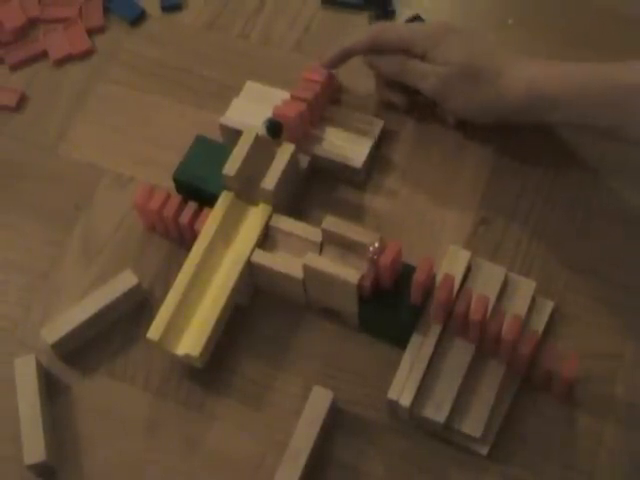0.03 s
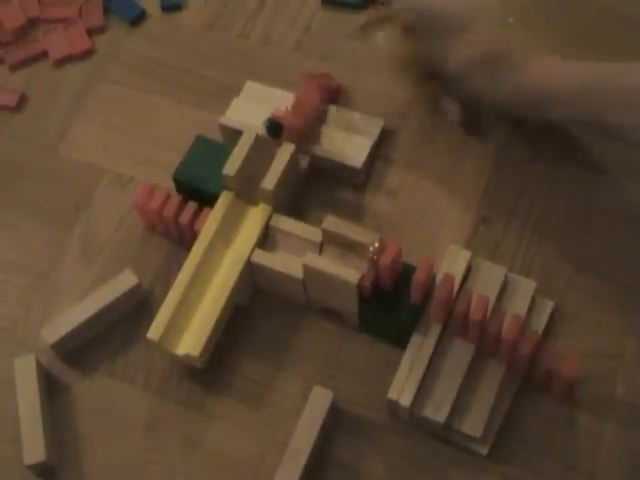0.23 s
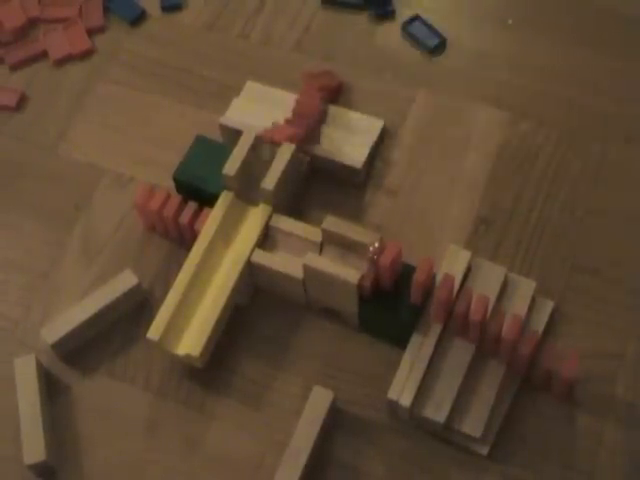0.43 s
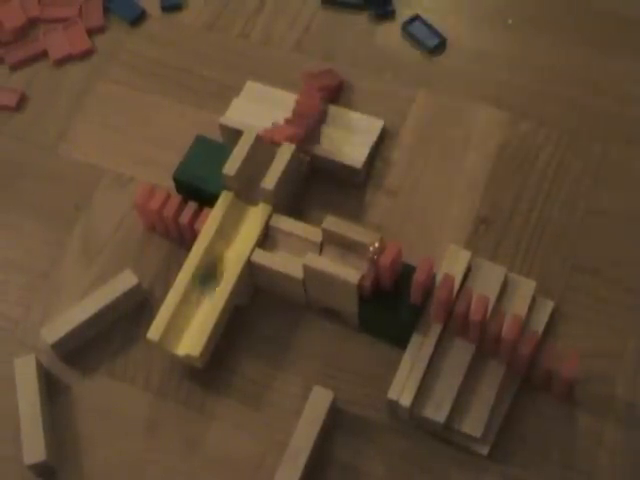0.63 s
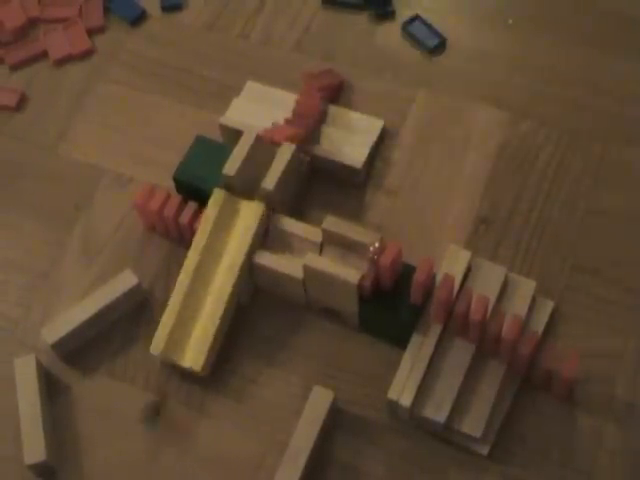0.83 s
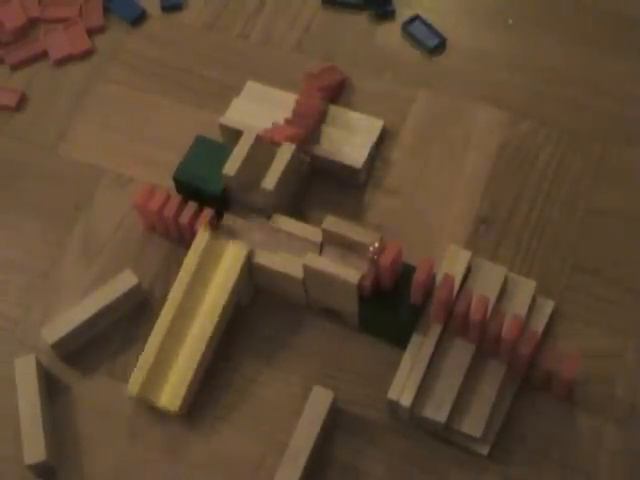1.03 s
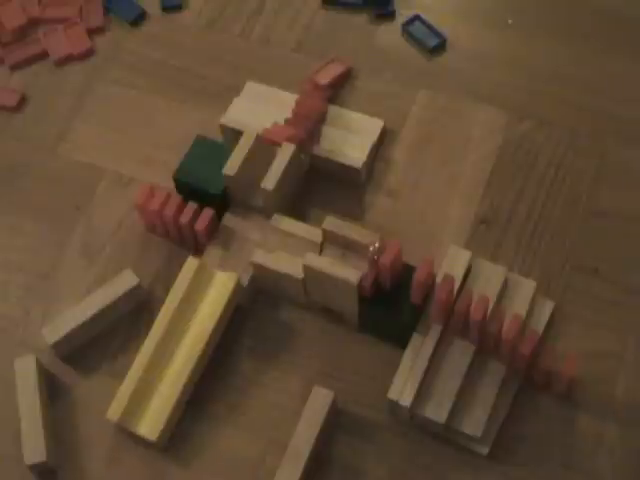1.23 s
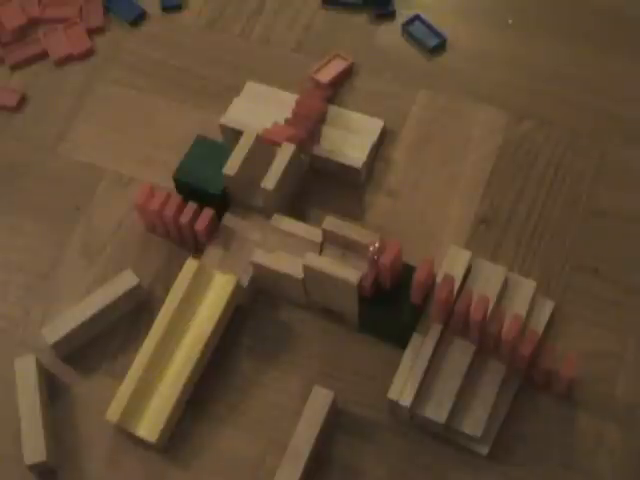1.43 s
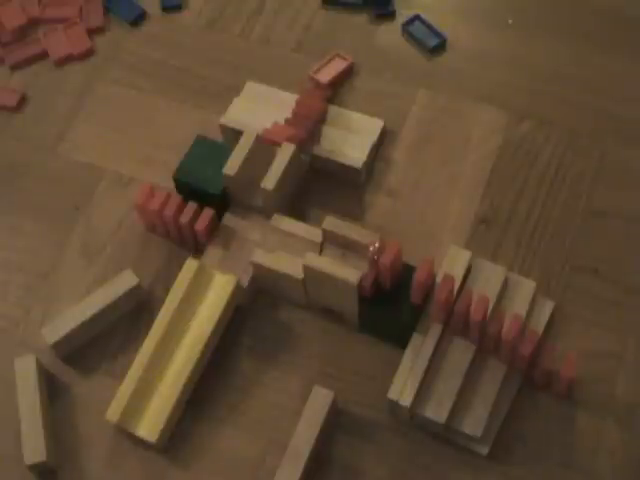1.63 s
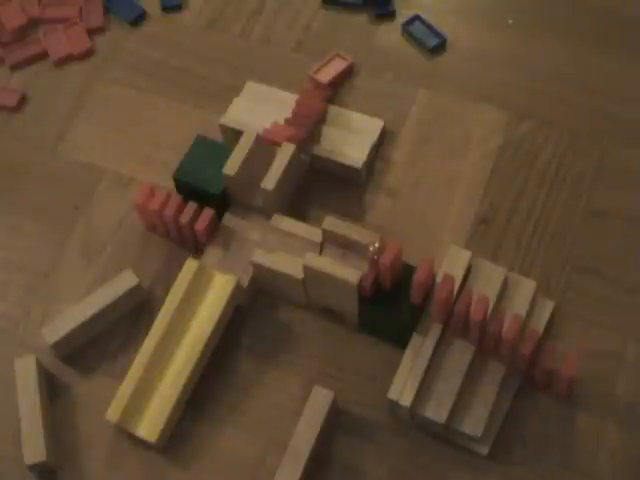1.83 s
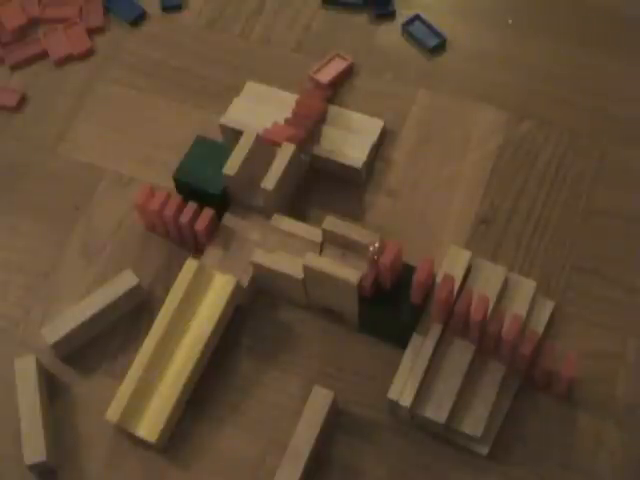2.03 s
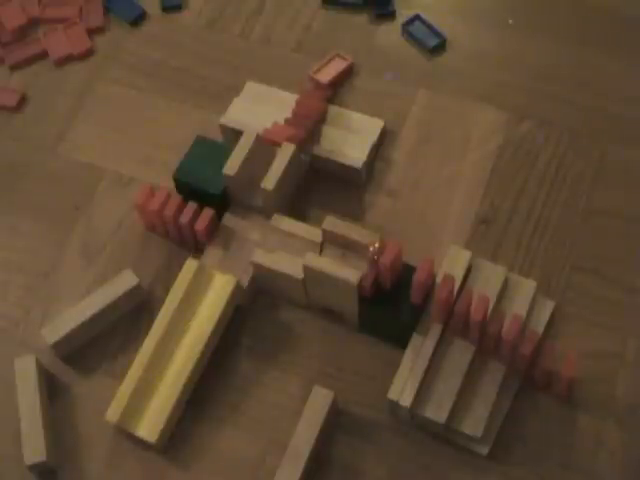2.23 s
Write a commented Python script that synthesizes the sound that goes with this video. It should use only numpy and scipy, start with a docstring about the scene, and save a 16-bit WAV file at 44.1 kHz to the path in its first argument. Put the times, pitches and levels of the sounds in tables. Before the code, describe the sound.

Toppling dominoes click in a toy chain reaction, with a rolling marble and clattering wood.

```python
"""Small dominoes click and topple on a wooden floor in a quiet room: a toy chain reaction.
They start a marble, which rumbles down a wooden chute and knocks it loose. The chute skids and bounces
over the floor; then come a dull thump, a low sinking hum as of something rolling to rest, and one last
sharp clack. Hits are made of fading tones and noise; the marble and the skid are many tiny impacts."""
import sys
import numpy as np
from scipy import signal
from scipy.fft import rfft, irfft
from scipy.io import wavfile
from scipy.ndimage import uniform_filter1d

SR = 44100
rng = np.random.default_rng(int(sys.argv[2]) if len(sys.argv) > 2 else 0)


def dump(signal):
    """Clip the signal to [-1, 1] and save it as 16-bit WAV at the path in sys.argv[1]."""
    limited = np.clip(np.atleast_2d(signal).T, -1, 1)
    pcm = np.round(limited * 32767).astype(np.int16)
    wavfile.write(sys.argv[1], SR, pcm)


N = 101429
T = np.arange(N) / SR

# domino hits (t/s, level/dB, lowest tone f/Hz, main upper tone f/Hz, upper tones' level/dB)
DOMINOES = [(.004, -41.5, 4700, 9000, -24), (.155, -48, 4800, 9000, -19), (.2115, -17, 4710, 9150, -15),
            (.2365, -14, 5140, 9240, -1), (.2395, -30, 5230, 9260, 3), (.2828, -14, 5050, 9290, -3.5),
            (.3115, -20, 5170, 9290, 1.5), (.354, -17.5, 4940, 9080, 4.5), (.406, -29, 4840, 9000, -2),
            (.4118, -11, 4867, 8720, -7.5), (.416, -15, 4830, 8700, -1.5), (.424, -18.5, 4840, 8700, 1),
            (.516, -18, 4750, 8900, -6), (.546, -23.5, 4920, 8950, 4.5), (.574, -18, 3852, 8700, -13),
            (.58, -16.5, 3860, 8800, -12), (.665, -7.5, 4656, 8900, -26), (.685, -15, 4490, 8800, -46),
            (.773, -19.5, 4880, 9000, -35), (.782, -15, 4830, 9200, 1.5), (.788, -21.5, 4460, 8840, 2),
            (.794, -21, 4620, 8700, 1), (.819, -34, 4630, 8800, -2), (.909, -21, 4600, 8800, -34),
            (.923, -28, 4600, 8800, -34), (1.412, -29, 4790, 8800, -25)]
# a domino's tones (ratio to its lowest or main upper tone, level/dB, t60/s: time to fade by 60 dB)
LOW_MODES = [(0.999, 0, 0.034), (1.056, -9, 0.022), (1.31, -14, 0.027)]
HIGH_MODES = [(0.999, -3.5, 0.028), (1.034, -12.5, 0.015), (1.18, -16, 0.018), (1.43, -21, 0.02)]
# hits on wood, the chute's bounces, dull thumps (t/s, level/dB, brightness/dB per octave)
KNOCKS = [(.2115, -30.5, 0.5), (.2365, -20, 10), (.2828, -26.5, 15), (.354, -27, 9), (.412, -8, 7.5),
          (.424, -14, -1.5), (.516, -14, 7.5), (.535, -12.5, -2), (.574, -9.5, -3.5), (.580, -9, -2.5),
          (.665, -1.5, 1), (.685, -4.5, -3), (.696, -15, -6.5), (.705, -22, -4), (.714, -23, 4),
          (.773, -19, -2.5), (.782, -19, -2.5), (.909, -18.5, -2), (.917, -25, 1), (.923, -22, -3),
          (.9795, 1.5, 2.5), (2.263, -24.5, -4.5)]
BOUNCES = [(1.006, -1.5, 0.5), (1.016, -6, 0.5), (1.041, -3.5, -4.5), (1.075, 0.5, 1.5), (1.100, -6, -3),
           (1.116, -3, -1.5), (1.143, -0.5, 3), (1.206, 1.5, -0.5), (1.2543, 0.5, -1), (1.2904, -1, 0.5),
           (1.320, -2.5, -1.5), (1.344, -6, -0.5), (1.3644, -7.5, -2), (1.3804, -9.5, -2)]
THUMPS = [(1.688, -20.5, -3.5), (1.695, -15.5, -2), (1.702, -16, 0), (1.743, -20, -2), (1.912, -28.5, -5)]
# ringing tones of the floor, chute, thump and last clack (f/Hz, level/dB, t60/s)
FLOOR_MODES = [(45, -54, 0.051), (158.5, -31.5, 0.14), (215, -31.5, 0.17), (350, -37, 0.17)]
CHUTE_MODES = [(824, -13, 0.27), (920, -9, .2), (972, -2, 0.22), (1080, -7, 0.18), (1164, -0.5, .2),
               (1303, -9, 0.25), (1490, -4, .2), (1502, -3, 0.29), (1740, -14, .2), (1856, -3, 0.17),
               (1965, -6, 0.13), (2130, -1.5, .2), (2250, 5, 0.13), (2645, 3, 0.097)]
BOOM_MODES = [(33.1, -29, 1.1), (65.5, -19.5, 0.39), (210, -8, 0.12)]
CLACK_MODES = [(1462, -18, 0.02), (1604, -9.5, 0.017), (4850, -23, 0.048), (6500, -44, 0.048),
               (8660, -18, 0.041), (12740, -36, .03)]
# how the longer sounds rise and fall (t/s, level/dB)
MARBLE_ROLL = [(.22, -67), (.42, -41.5), (.53, -49), (.60, -34.5), (.72, -35), (.79, -31.5), (.86, -37),
               (.93, -36), (.97, -57), (1.3, -57), (1.58, -68), (1.68, -43)]
TICKS = [(.55, -58), (.63, -34.5), (.72, -38.5), (.83, -34.5), (.89, -40.5), (.94, -60)]
RATTLE = [(.78, -71), (.785, -22.5), (.80, -35), (.825, -35), (.835, -55)]
FLOOR_ROLL = [(1.40, -58), (1.55, -54.5), (1.67, -48.5), (1.78, -35), (1.92, -39), (2.02, -43.5),
              (2.08, -57), (2.3, -59)]
SCRAPE = [(1.69, -68), (1.73, -33.5), (1.85, -40.5), (1.97, -43), (2.1, -44), (2.2, -52), (2.3, -45)]
SETTLE = [(2.075, -68), (2.095, -38), (2.115, -39), (2.15, -61)]
# the skidding chute (t/s, level/dB, treble level/dB)
SKID = [(.976, -51, 21), (.984, -21, 7), (1.05, -17, 1), (1.12, -20, -0.5), (1.18, -21.5, 4.5),
        (1.24, -24.5, -1), (1.30, -25.5, -12), (1.38, -24, -32), (1.44, -27.5, -28), (1.485, -34, -12),
        (1.505, -46, -5), (1.56, -53, -39)]
# the sinking hum (t/s, f/Hz, level/dB)
HUM = [(1.75, 216.3, -50), (1.785, 206, -28), (1.82, 193, -20), (1.85, 182, -24), (1.89, 164.5, -36),
       (1.96, 164.4, -31.5), (1.99, 182.4, -44), (2.02, 182.5, -35), (2.06, 170, -64)]
# each sound's colour: how strong it is from bass to treble (f/Hz, level/dB)
CRACK_COLOUR = [(100, -30), (1000, -22.5), (3500, -9), (5000, -9.5), (7000, -7.5), (9500, -8),
                (13000, -14.5), (14500, -33), (16500, -11)]
WOOD_COLOUR = [(30, -40), (95, -43), (160, -3.5), (230, -5.5), (500, -5), (1100, -1), (2300, 0.5),
               (3500, -2.5), (5200, -1.5), (7000, -17.5), (11000, -26.5), (14000, -40), (16500, -46)]
MARBLE_COLOUR = [(40, -46), (110, -11), (160, -7.5), (215, 5.5), (270, -1.5), (350, 1.5), (480, -7),
                 (900, -11.5), (1700, -14.5), (3000, -26), (6000, -31), (15000, -48)]
TICK_COLOUR = [(100, -18), (900, -16), (1700, 8), (2700, -2.5), (4500, -23), (15000, -46)]
RATTLE_COLOUR = [(100, -13), (900, -10), (1600, 9), (2500, -10), (4500, 0), (7000, -4), (9000, -9),
                 (13000, -15), (16000, -30)]
SKID_COLOUR = [(30, -35), (100, -20), (190, 1), (300, -5), (600, -8), (1050, 2.5), (1600, 3), (2400, 0.5),
               (3500, -6.5), (5000, -26.5), (15000, -51.5)]
SKID_TREBLE = [(100, -30), (2000, -9), (3200, 17.5), (5000, 2.5), (7000, -2), (10000, -25), (15000, -45)]
BOUNCE_COLOUR = [(30, -29), (100, -35), (190, -8), (500, -7), (1100, 0.5), (1700, 1), (2400, 6.5),
                 (3400, 1.5), (5200, -5.5), (7000, -19.5), (11000, -32.5), (16000, -46)]
FLOOR_ROLL_COLOUR = [(30, -14), (70, -17), (110, -0.5), (160, -1.5), (230, -5), (370, -6), (520, -20.5),
                     (1500, -34), (15000, -61)]
THUMP_COLOUR = [(30, -10), (48, -19), (70, -7), (120, -13.5), (210, -0.5), (270, -7.5), (410, -5),
                (620, -13), (830, -7), (1400, -11), (2500, -15), (5000, -23), (10000, -30.5), (15000, -47)]
SCRAPE_COLOUR = [(30, 2.5), (100, 0), (350, -0.5), (550, -4.5), (1500, -3.5), (4000, -9), (9000, -16.5),
                 (15000, -32)]
SETTLE_COLOUR = [(60, -23), (250, -5), (400, -2), (700, 2), (1000, -7), (1800, -7), (5000, -30),
                 (15000, -49)]
AIR_COLOUR = [(25, -31), (50, -15), (134, -5.5), (400, -5), (1200, -7.5), (2760, -12), (6000, -19),
              (11000, -22.5), (14500, -35), (16500, -61)]
# the room's echo (f/Hz, t60/s, level/dB)
ROOM = [(100, 1, -8.5), (252, 0.82, -13.5), (1000, 0.33, -7), (3900, 0.39, -5), (9000, 0.24, -9),
        (16000, .2, -42)]
# stereo balance (f/Hz, left minus right level/dB)
BALANCE = [(60, 1), (300, -3), (1000, -2.4), (2500, 0.7), (9000, -1.4)]
CRACK_T60_S = 0.015


def amp(db):
    """Turn decibels into a gain."""
    return 10 ** (np.asarray(db) / 20)


def unit(x):
    """Scale to an average power of 1."""
    return x / np.sqrt(np.mean(x ** 2))


def curve(rows, column=1):
    """Follow one column of a table through time."""
    rows = np.array(rows)
    return np.interp(T, rows[:, 0], rows[:, column])


def swell(rows):
    """A gain that follows a level table, silent outside it."""
    return amp(curve(rows)) * (T >= rows[0][0]) * (T <= rows[-1][0])


def across(hz, rows, column=1):
    """Follow one column of a table from bass to treble."""
    rows = np.array(rows)
    return np.interp(np.log(hz + 1), np.log(rows[:, 0]), rows[:, column])


def colour(x, points, tilt=0, size=4096):
    """Filter a sound to a colour; tilt brightens it, in dB per octave."""
    hz = np.arange(size // 2 + 1) * SR / size
    db = across(hz, points) + tilt * np.log2(np.maximum(hz, 200) / 2000)
    cepstrum = irfft(np.log(amp(db)))
    cepstrum[1:size // 2] *= 2  # folded so that nothing rings before a hit
    cepstrum[size // 2 + 1:] = 0
    response = irfft(np.exp(rfft(cepstrum)))
    return signal.fftconvolve(x, response / np.linalg.norm(response))[:len(x)]


def fade(t60, t):
    """Die away by 60 dB every t60 seconds."""
    return np.exp(-np.log(1000) * t / t60)


def add(out, at, x):
    """Mix a sound in at a time in seconds."""
    start = max(int(at * SR), 0)
    out[start:start + len(x)] += x[:N - start]


def ring(modes, t):
    """A struck object rings with fading tones, its modes."""
    return sum(amp(db) * fade(t60, t) * np.sin(2 * np.pi * hz * t) for hz, db, t60 in modes)


def blows(rows, points, t60, contact):
    """Each blow is a contact click and fast-fading noise in the object's colour."""
    out, t = np.zeros(N), T[:N // 8]
    for at, db, tilt in rows:
        burst = rng.standard_normal(len(t)) * fade(t60, t)
        burst[0] = contact
        hit = colour(burst, points, tilt)
        size = np.hypot(contact, np.linalg.norm(fade(t60, t)))
        add(out, at, amp(db) * hit * size / np.linalg.norm(hit) / 2)
    return out


def chatter(rate_hz, spread_db, ring_s, jitter, tail_db=0):
    """Tiny impacts, uneven in timing and strength, each with a short noisy tail."""
    taps, t = np.zeros(N), T[:N // 100]
    gaps, strengths = rng.standard_normal((N // 40, 2)).T
    for at, strength in zip(np.cumsum(np.exp(jitter * gaps) / rate_hz), strengths):
        if at < T[-1]:
            taps[int(at * SR)] += amp(spread_db * np.clip(strength, -2, 2))
    tail_power = signal.fftconvolve(taps ** 2, fade(ring_s, t) ** 2)[:N]
    tails = np.sqrt(np.abs(tail_power)) * rng.standard_normal(N)
    return unit(unit(taps - taps.mean()) + amp(tail_db) * unit(tails))


def domino_pings(rise_s=0.00023, scatter=0.0057):
    """Each domino rings with the same set of tones at its own pitch."""
    out, t = np.zeros(N), T[:N // 12]
    for at, db, low_hz, high_hz, upper_db in DOMINOES:
        modes = [(low_hz * ratio, level, t60) for ratio, level, t60 in LOW_MODES]
        modes += [(high_hz * ratio, level + upper_db, t60) for ratio, level, t60 in HIGH_MODES]
        detuned = [(hz * (1 + scatter * rng.standard_normal()), level, t60) for hz, level, t60 in modes]
        add(out, at, amp(db) * ring(detuned, t) * (1 - np.exp(-t / rise_s)))
    return out


def domino_cracks(gain_db=-7.5, tilt_per_db=0.13):
    """Hard dominoes meet with a crack, brighter when their upper tones are strong."""
    rows = [(at, db + gain_db, tilt_per_db * upper_db) for at, db, _, _, upper_db in DOMINOES]
    return blows(rows, CRACK_COLOUR, CRACK_T60_S, contact=1.5)


def wood_knocks():
    """Pieces and the bouncing chute strike wood; the floor gives a little and rings."""
    knocks = amp(1) * blows(KNOCKS, WOOD_COLOUR, t60=0.019, contact=3.3)
    bounces = amp(0.5) * blows(BOUNCES, BOUNCE_COLOUR, t60=0.02, contact=2)
    pushes = np.zeros(N)
    for at, db, _ in KNOCKS + BOUNCES:
        pushes[int(at * SR)] += amp(db)
    return knocks + bounces + signal.fftconvolve(pushes, ring(FLOOR_MODES, T[:N // 8]))[:N]


def marble():
    """The marble rumbles down the chute and ticks lightly against it."""
    rumble = chatter(rate_hz=500, spread_db=2.5, ring_s=0.0084, jitter=.6, tail_db=1.5)
    ticks = chatter(rate_hz=125, spread_db=4.5, ring_s=0.0047, jitter=.3, tail_db=-5)
    return colour(rumble, MARBLE_COLOUR) * swell(MARBLE_ROLL) + colour(ticks, TICK_COLOUR) * swell(TICKS)


def domino_rattle():
    """Fallen dominoes rattle on each other as they pile up."""
    taps = chatter(rate_hz=400, spread_db=3, ring_s=0.01, jitter=0.45)
    return swell(RATTLE) * colour(taps, RATTLE_COLOUR)


def chute_skid(treble_db=-5, ring_db=-8, lift_db=-5, lift_s=0.0074):
    """The chute chatters and rings, duller as it slows; it lifts off just before each bounce."""
    taps = chatter(rate_hz=380, spread_db=1.5, ring_s=0.022, jitter=.45, tail_db=1)
    lift = amp(lift_db * sum(np.exp(-np.abs(at - T) / lift_s) * (T < at) for at, _, _ in BOUNCES))
    treble = amp(treble_db + curve(SKID, column=2)) * colour(taps, SKID_TREBLE)
    sliding = swell(SKID) * lift * (colour(taps, SKID_COLOUR) + treble)
    tones = ring(CHUTE_MODES, T[:N // 6])
    ringing = signal.fftconvolve(taps * swell(SKID), tones / np.linalg.norm(tones))[:N]
    return sliding + amp(ring_db) * ringing


def floor_roll():
    """Something rolls nearer over the floor with a low rumble, then fades."""
    return swell(FLOOR_ROLL) * colour(rng.standard_normal(N), FLOOR_ROLL_COLOUR)


def thump(boom_at=1.694):
    """A few dull blows; the heaviest leaves a low ringing."""
    out = 2 * blows(THUMPS, THUMP_COLOUR, t60=0.18, contact=6)
    add(out, boom_at, ring(BOOM_MODES, T))
    return out


def scrape():
    """Faint scraping noise follows the thump."""
    return swell(SCRAPE) * colour(rng.standard_normal(N), SCRAPE_COLOUR)


def sinking_hum(octave_db=-12, waver_db=3):
    """A low tone and its octave sink and waver, as of something rolling to rest."""
    phase = 2 * np.pi * np.cumsum(curve(HUM)) / SR
    tone = np.sin(phase) + amp(octave_db) * np.sin(2 * phase)
    waver = amp(waver_db * unit(uniform_filter1d(rng.standard_normal(N), size=500)))
    return tone * waver * swell([(at, db) for at, _, db in HUM])


def clack(at=2.0195, crack_db=-13.5, tilt=-3):
    """One hard piece strikes another: a crack and a ring."""
    out = blows([(at, crack_db, tilt)], CRACK_COLOUR, CRACK_T60_S, contact=1)
    add(out, at, ring(CLACK_MODES, T))
    return out


def settle():
    """A piece chatters briefly as it settles after the clack."""
    taps = chatter(rate_hz=650, spread_db=2.5, ring_s=0.018, jitter=.4)
    return swell(SETTLE) * colour(taps, SETTLE_COLOUR)


def room(x, build_s=0.0064, echoes=14, early_s=0.035, early_db=-11):
    """Sound bounces round the room: early echoes and a smooth tail, in two random versions."""
    t = T[:N // 3]
    hz = np.fft.rfftfreq(len(t), 1 / SR)
    octaves_hz = 62.5 * 2 ** np.arange(9)
    out = []
    for _ in range(2):
        noise, response = rfft(rng.standard_normal(len(t))), 0
        for centre, pick in zip(octaves_hz, np.eye(len(octaves_hz))):
            shape = fade(across(centre, ROOM), t) * (1 - np.exp(-t / build_s))
            band = irfft(noise * np.interp(np.log(hz + 1), np.log(octaves_hz), pick), len(t))
            response += band * shape / np.linalg.norm(shape) * amp(across(centre, ROOM, column=2))
        for when, size in rng.random((echoes, 2)):
            delay = int((.001 + when * early_s) * SR)
            response[delay] += amp(early_db) * (2 * size - 1) * 2 / np.sqrt(echoes)
        out.append(signal.fftconvolve(x, response)[:N])
    return np.array(out)


def scene(low_echo_db=-8, knock_echo_db=-1, air_db=-52, width=0.69, ending_left_db=-1):
    """All the pieces and their echoes, over the soft hiss of still air."""
    rubbing = marble() + chute_skid() + settle()
    knocks = wood_knocks()
    dominoes = domino_pings() + domino_cracks() + domino_rattle()
    low = thump() + sinking_hum() + floor_roll() + scrape()
    last = clack()
    echo = room(rubbing + amp(knock_echo_db) * knocks + dominoes + amp(low_echo_db) * low + last)
    air = amp(air_db) * np.array([colour(rng.standard_normal(N), AIR_COLOUR) for _ in range(2)])
    middle, spread = echo + air
    spread = signal.sosfilt(signal.butter(1, 130, "high", fs=SR, output="sos"), spread)
    sides = np.array([[1], [-1]])  # left, right
    ending = (low + last) * amp(sides * ending_left_db / 2)
    return rubbing + knocks + dominoes + ending + middle + width * spread * sides


def record(dry, ceiling=0.88, top_hz=16100):
    """The microphones lean a little to the right, round the peaks and cut the highest treble."""
    lean_db = across(np.fft.rfftfreq(N, 1 / SR), BALANCE)
    leaning = irfft(rfft(dry) * amp(np.array([lean_db, -lean_db]) / 2), N)
    rounded = ceiling * np.tanh(leaning / ceiling)
    return signal.sosfilt(signal.ellip(8, .2, 70, top_hz, fs=SR, output="sos"), rounded)


dry = scene()
out = record(dry)
dump(out)
```